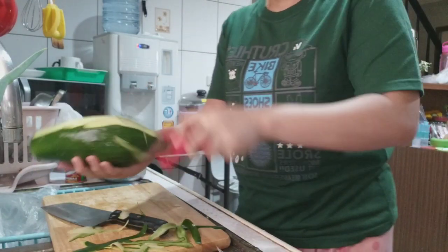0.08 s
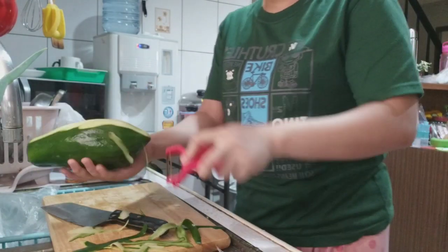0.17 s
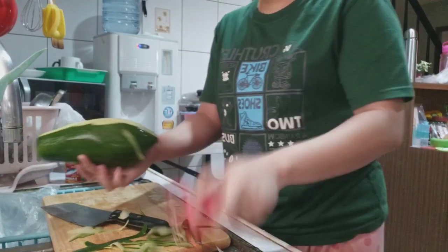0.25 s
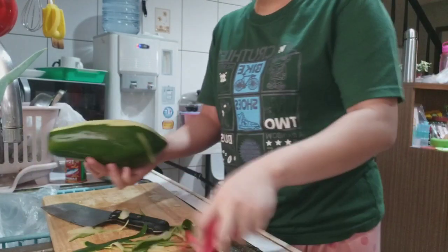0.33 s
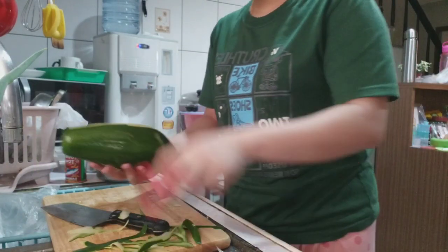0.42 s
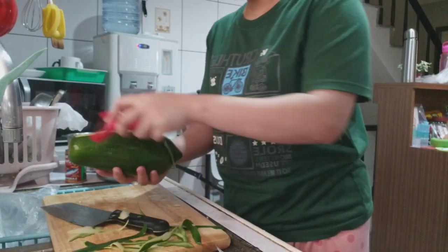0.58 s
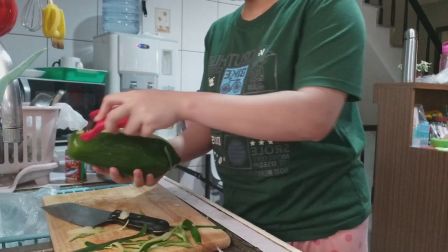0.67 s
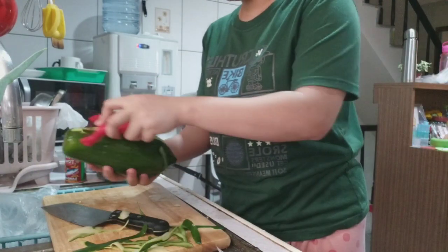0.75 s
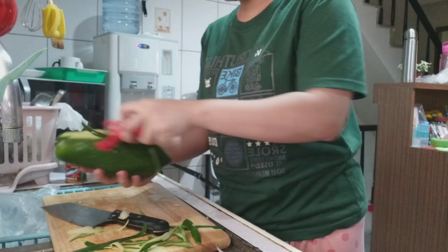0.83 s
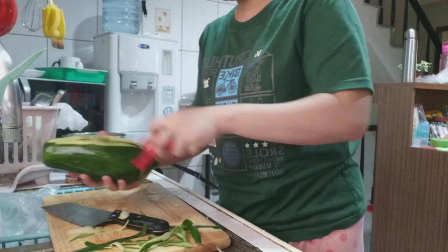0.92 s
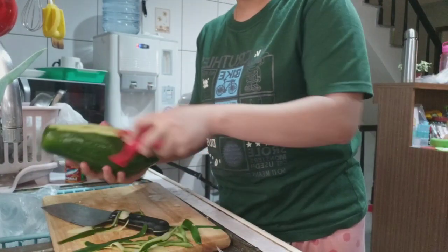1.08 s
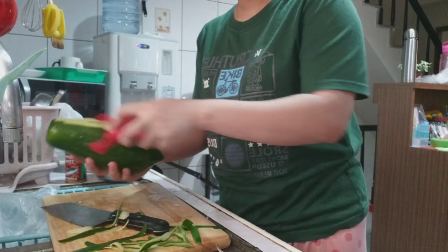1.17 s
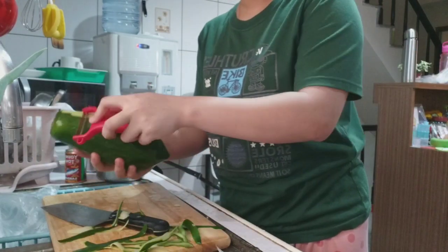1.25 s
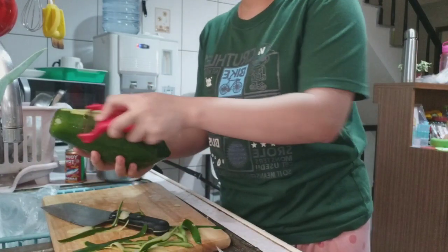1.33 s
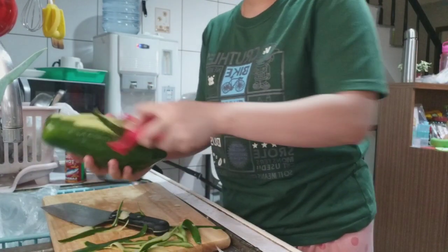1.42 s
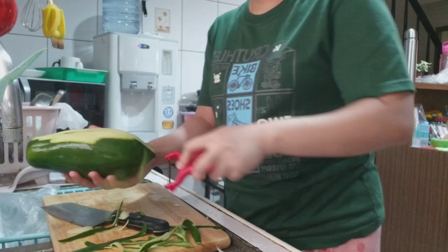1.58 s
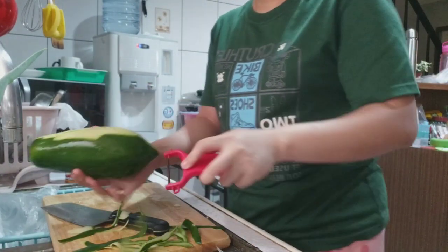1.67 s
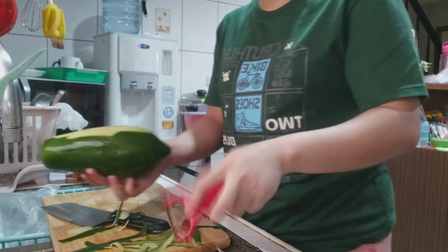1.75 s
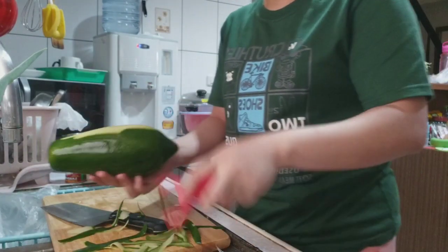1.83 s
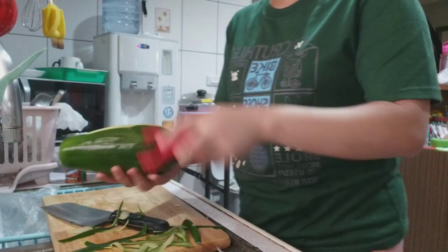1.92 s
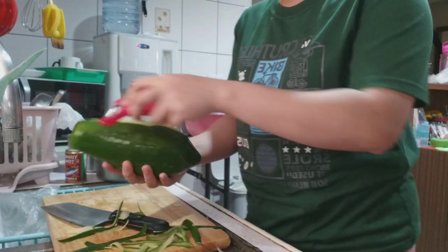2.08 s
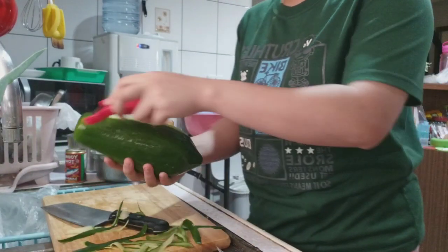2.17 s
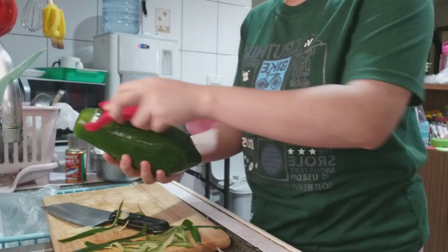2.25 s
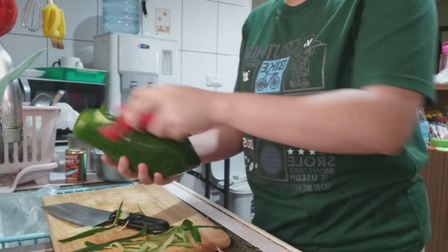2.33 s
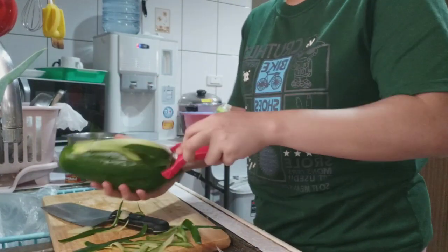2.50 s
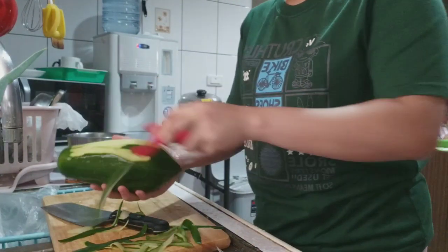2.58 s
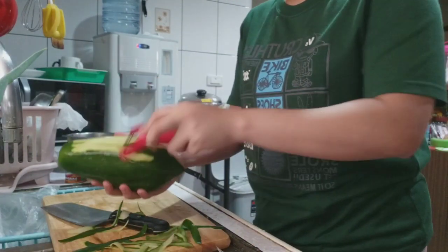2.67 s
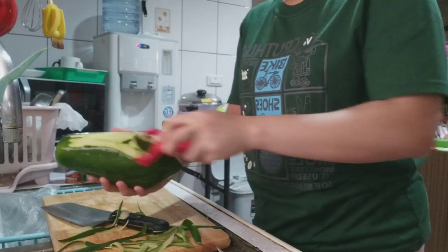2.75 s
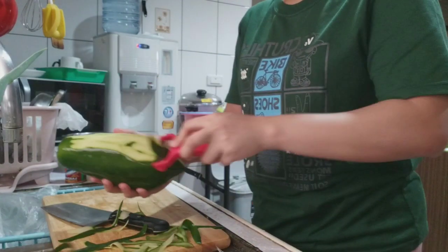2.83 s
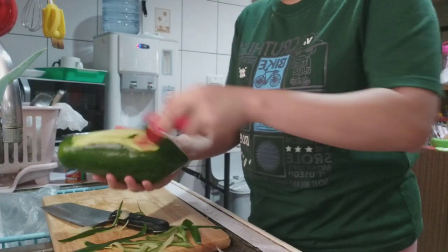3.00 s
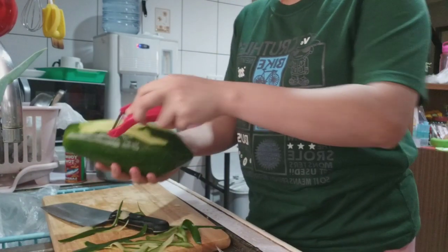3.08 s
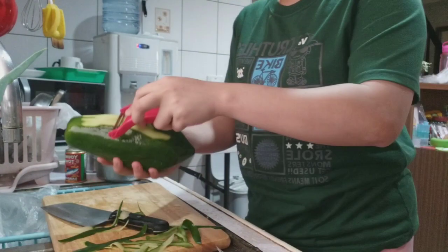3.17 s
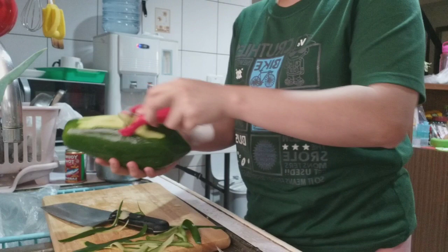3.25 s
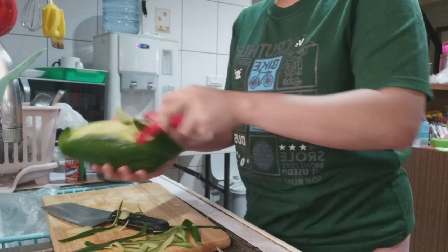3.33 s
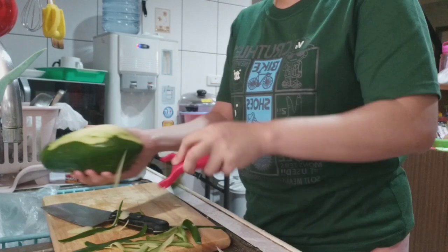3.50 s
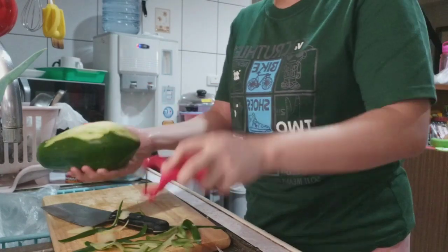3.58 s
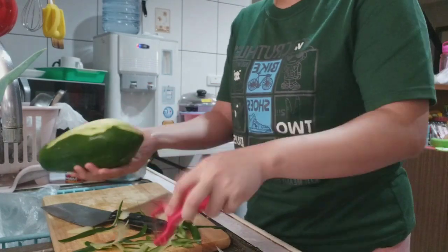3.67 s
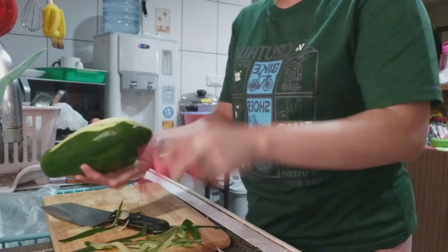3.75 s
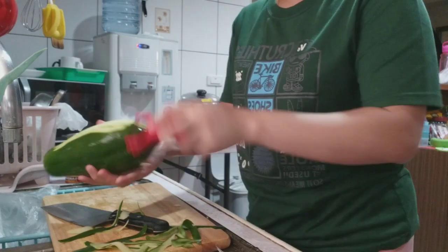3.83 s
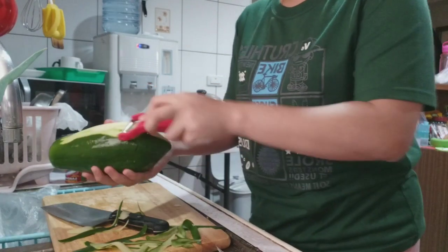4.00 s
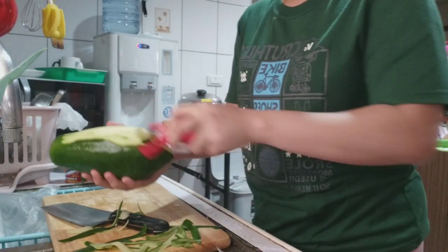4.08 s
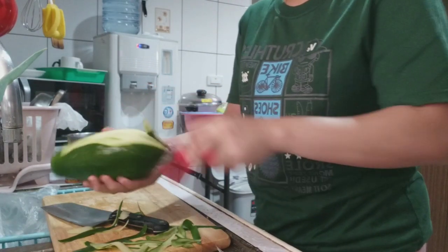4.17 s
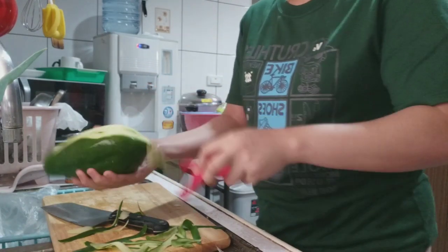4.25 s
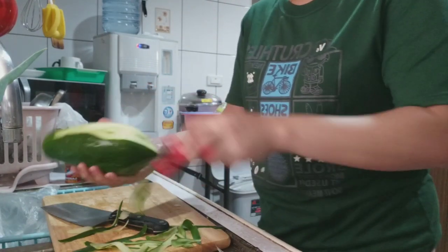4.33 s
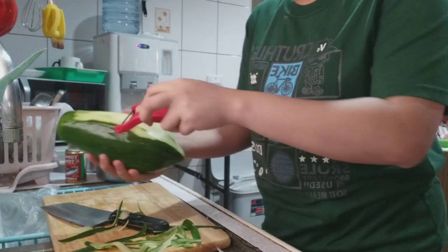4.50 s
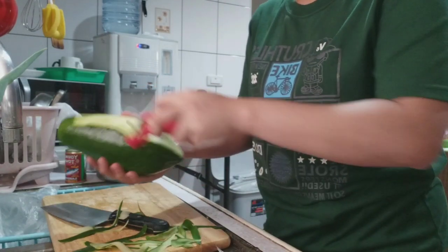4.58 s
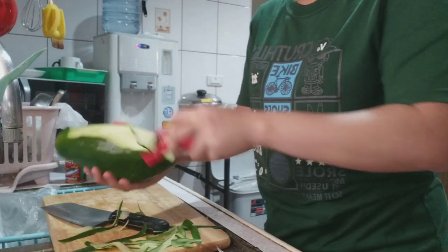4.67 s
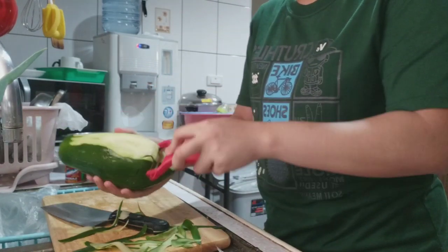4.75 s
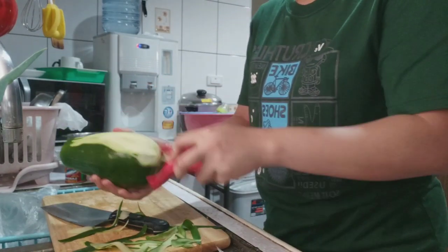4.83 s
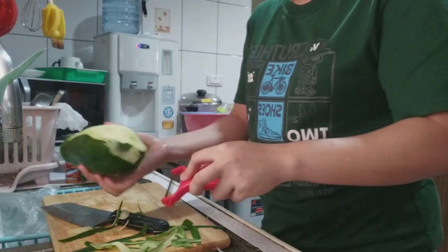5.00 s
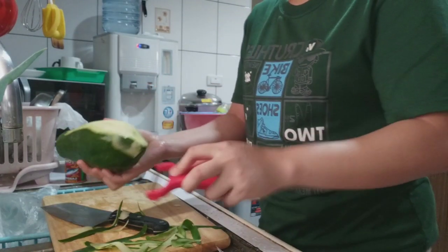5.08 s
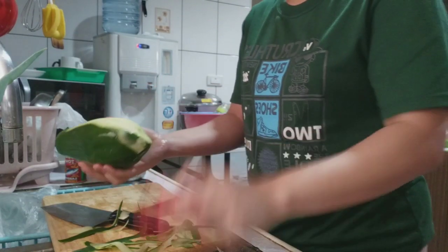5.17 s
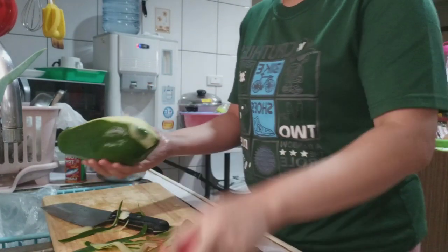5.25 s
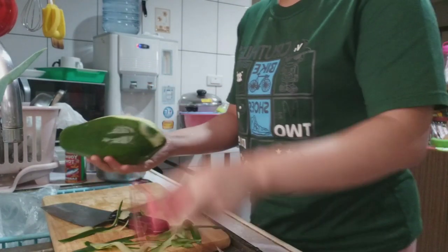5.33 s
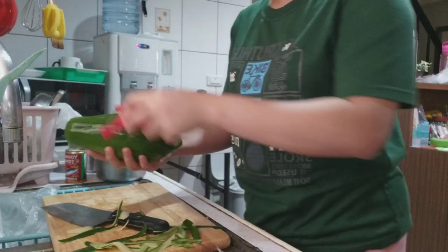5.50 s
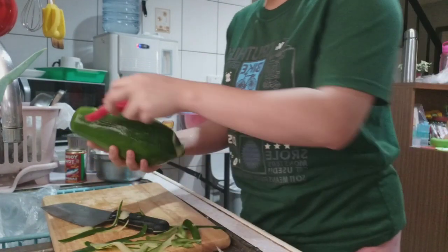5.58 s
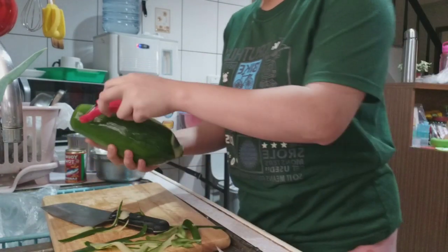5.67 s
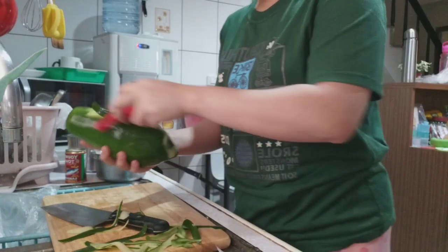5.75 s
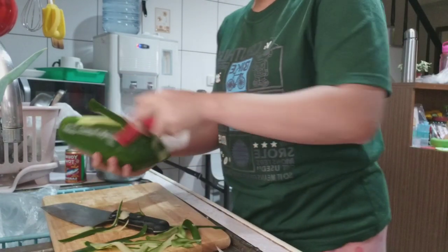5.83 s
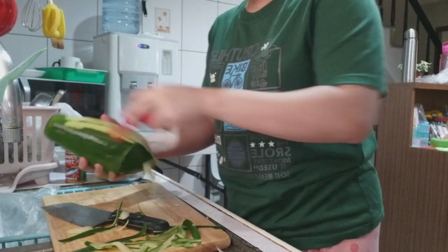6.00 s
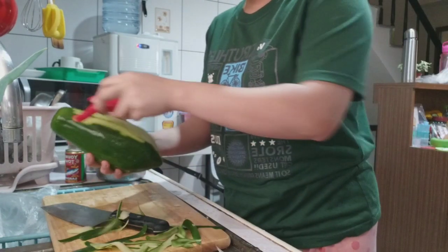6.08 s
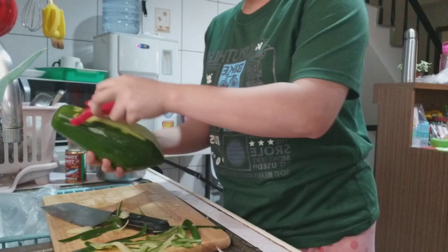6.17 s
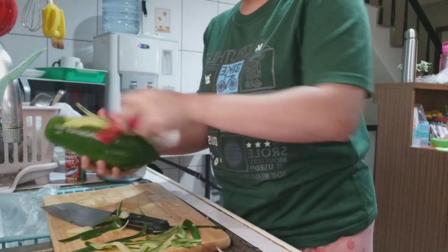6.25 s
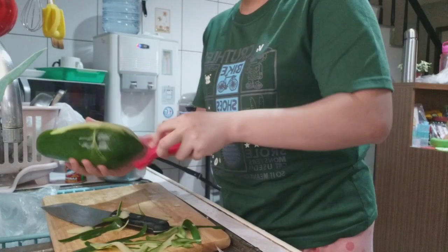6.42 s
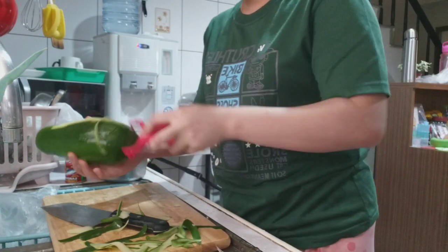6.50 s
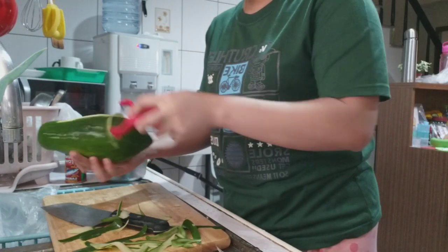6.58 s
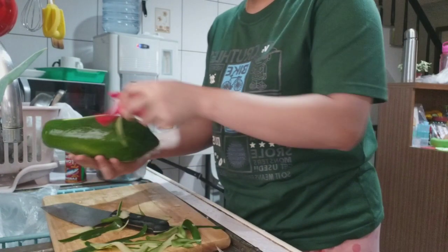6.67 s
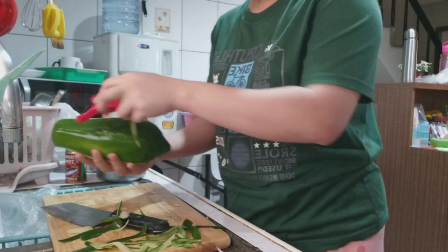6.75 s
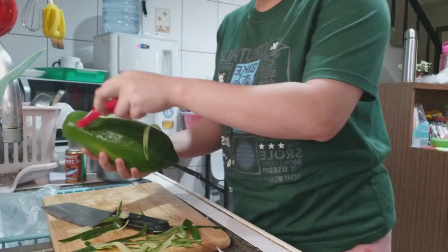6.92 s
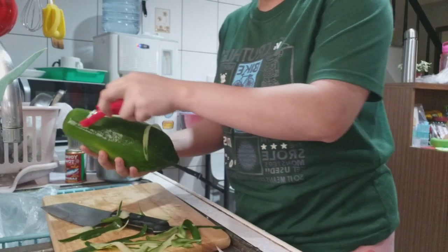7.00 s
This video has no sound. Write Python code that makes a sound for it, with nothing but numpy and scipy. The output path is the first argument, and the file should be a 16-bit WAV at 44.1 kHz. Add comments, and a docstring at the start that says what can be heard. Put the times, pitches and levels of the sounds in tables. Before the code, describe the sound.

A handheld peeler rasps through the skin of a firm fruit in short, uneven strokes, its loose blade clicking, in a small kitchen.

```python
"""A swivel peeler strips a firm green fruit over a board, an arm's length from a two-port microphone.
The blade lands with a clatter, then sticks and slips through the skin, ringing the plastic frame while
cells burst in a fine hiss and the flesh crunches; set free, the blade ticks and rings.
Fruit, hand and falling peel knock dully. The place is a small, live, tiled kitchen; a fridge hums."""
import sys
import numpy as np
from scipy import signal
from scipy.fft import rfft, irfft, next_fast_len
from scipy.io import wavfile
from scipy.ndimage import uniform_filter1d, map_coordinates

SR = 44100
rng = np.random.default_rng(int(sys.argv[2]) if len(sys.argv) > 2 else 0)


def dump_mix(stems):
    """Bounce the given channels to the path in sys.argv[1] as a 16-bit WAV at rate SR."""
    frames = np.atleast_2d(stems).T  # one column per channel
    limited = np.clip(frames, -1, 1)  # hard clip at full scale
    pcm = np.round(limited * 32767).astype(np.int16)
    wavfile.write(sys.argv[1], SR, pcm)


N = 310023
T = np.arange(N) / SR

# resonances of the plastic frame: (frequency [Hz], width [Hz], level [dB])
FRAME_MODES = [(1863, 283, -10.5), (2510, 120, -5.5), (2744, 104, 0), (2891, 138, 3), (3342, 130, -3.5),
               (3520, 156, -2), (3768, 294, -2.5), (4240, 300, -6), (5620, 500, -21)]
# steel blade pressed on the fruit: (frequency [Hz], width [Hz], level [dB])
STEEL_MODES = [(5554, 820, 3.5), (6630, 390, -4.5), (6390, 870, -1)]
# spectrum of bursting cells: (frequency [Hz], level [dB])
CELL_SPECTRUM = [(2000, -22), (4500, 5.5), (5700, -1.5), (7200, -4), (9500, -0.5), (12000, -2.5),
                 (14500, -4.5), (16000, -0.5)]
# strokes over the board: (start [s], deepest bite [s], end [s], rasp at the bite [dB],
# swell up to the bite [dB], upper frame modes re lower [dB], cell hiss [dB], exit scrape [dB])
STROKES = [(-.1, 0.022, .105, -28.5, -33, -1, -41.5, -42), (.715, 0.828, .925, -28, 8.5, -1.5, -42, -62),
           (1.29, 1.396, 1.531, -29.5, 14, -4.5, -41.5, -42),
           (2.222, 2.378, 2.46, -26.5, 15.5, -8.5, -39.5, -44),
           (2.696, 2.797, 2.825, -34.5, 2, -11, -39, -48),
           (3.151, 3.362, 3.41, -32.5, 13.5, -7, -38.5, -42),
           (3.987, 4.118, 4.155, -36, -1.5, -9, -43, -56), (4.54, 4.638, 4.685, -31.5, 9, -12, -39, -41),
           (4.786, 4.815, 4.85, -46.5, 3, 0, -42.5, -44), (5.648, 5.803, 5.865, -29.5, 13.5, -13, -40, -51),
           (6.152, 6.318, 6.38, -31.5, 8.5, -18, -42.5, -37.5),
           (6.928, 7.14, 7.23, -33.5, 15.5, -8, -46.5, -46)]
def peeling(rise_s=.027, release_s=.009, puff_s=.0038, split_hz=3400, tilt_db_per_s=51):
    """Slips shake the frame, the steel and the fruit; each lets go a puff of bursting cells."""
    slip = stick_slip(typical_hz=560, jitter=.48, scatter_db=1)
    force = unit(slip) + unit(grains(N, rate=5000, scatter_db=2.5))
    puffs = signal.lfilter([1], [1, -np.exp(-1 / (puff_s * SR))], slip)
    bursts = grains(N, rate=16000, scatter_db=5.5) * np.sqrt(puffs)
    steel, flesh = unit(resonate(force, STEEL_MODES)), unit(resonate(force, FLESH_MODES))
    hiss = unit(colour(bursts, CELL_SPECTRUM)) + undb(-13) * steel
    spray = unit(colour(bursts, [(5750, -35), (11500, -4), (23000, 0)]))  # the finest fizz
    crossover = [signal.butter(4, split_hz, side, fs=SR, output="sos") for side in ("low", "high")]
    out = crunches(force)
    for start, bite, end, rasp_db, swell_db, upper_db, hiss_db, scrape_db in STROKES:
        span = slice(max(int((start - rise_s) * SR), 0), int((end + release_s) * SR))
        t = T[span]
        contact = np.clip(np.minimum((t - start) / rise_s, (end - t) / release_s) + 1, 0, 1)
        push_db = hand_pressure(t, start, bite, end, swell_db)
        grip = 1 + .018 * rng.standard_normal()  # each new grip retunes the frame
        shake = flex(resonate(force[span], FRAME_MODES, grip), depth=.012)
        lower, upper = (unit(signal.sosfilt(sos, shake)) for sos in crossover)
        # the blade tilts as it travels, so the upper modes give way to the lower
        edge = undb(upper_db - tilt_db_per_s * (t - bite))
        frame = (lower + edge * upper) / np.hypot(1, edge)
        rasp = undb(-2) * frame + undb(-17) * flesh[span] + undb(-15) * spray[span]
        fizz = undb(hiss_db + 4.5 + .79 * push_db) * hiss[span]
        exit_scrape = undb(scrape_db) * bell(t, centre=end - .021, width=.015) * steel[span]
        out[span] += contact * (undb(rasp_db + push_db) * rasp + fizz + exit_scrape)
    return out * undb(2 * wander(N, rate=50))  # the level flickers


def stick_slip(typical_hz, jitter, scatter_db):
    """The edge loads up and lets go at uneven steps; a longer stick gives a bigger slip."""
    chance = rng.standard_normal((N // 20, 2))
    sticks = np.exp(jitter * chance[:, 0])
    sizes = sticks * undb(scatter_db * chance[:, 1])
    at = (np.cumsum(sticks) * SR / typical_hz).astype(int)
    return np.bincount(at[at < N], sizes[at < N], N)


def hand_pressure(t, start, bite, end, swell_db, ease_db=10.5):
    """The push of the hand, in dB, builds to the deepest bite, then eases off ever faster."""
    before = np.clip((bite - t) / (bite - start), 0, 1)
    after = np.clip((t - bite) / max(end - bite, .01), 0, 1)
    return -swell_db * before ** 1.17 - ease_db * after ** 1.6


def flex(x, depth):
    """The frame flexes, so its pitch wanders by a small share."""
    at = np.cumsum(1 + depth * wander(len(x), rate=14))
    return map_coordinates(x, [at], order=3, mode="mirror")


# resonances of the fruit and its strip of peel: (frequency [Hz], width [Hz], level [dB])
FLESH_MODES = [(598, 80, -7.5), (846, 90, -5.5), (995, 110, -6.5), (1301, 130, 3), (1590, 130, 5),
               (2160, 170, -3)]
# the blade digs in: (time [s], half-width [s], level [dB], centre [Hz], glide [octaves/s])
CRUNCHES = [(.045, 0.02, -33.5, 1135, -0.5), (0.847, 0.045, -40.5, 900, 13), (1.432, 0.054, -43.5, 940, 8),
            (2.398, .055, -39, 1275, 3), (2.78, 0.062, -57, 1410, -8), (3.371, 0.019, -34.5, 1240, -24),
            (4.128, 0.024, -42, 980, -1), (4.565, 0.034, -34.5, 700, -3), (4.644, 0.026, -34.5, 1150, -20),
            (5.796, 0.056, -40.5, 960, 2.5), (6.314, 0.025, -42, 1060, -3)]
def crunches(force, gain_db=-2, focus_octaves=.43):
    """A deep cut shakes the fruit; the place of the blade decides which flesh modes it drives."""
    modes = np.array([(-1) ** k * unit(resonate(force, [mode])) for k, mode in enumerate(FLESH_MODES)])
    out = np.zeros(N)
    for time, width, level_db, centre_hz, glide in CRUNCHES:
        span = slice(max(int((time - 2 * width) * SR), 0), int((time + 2 * width) * SR))
        centre = centre_hz * 2 ** (glide * (T[span] - time))
        drive = undb([db - 3 * (np.log2(hz / centre) / focus_octaves) ** 2 for hz, _, db in FLESH_MODES])
        flesh = (drive * modes[:, span]).sum(0) / np.linalg.norm(drive, axis=0)
        out[span] += undb(level_db + gain_db) * bell(T[span], time, width) * flesh
    return out


# the blade meets the skin: (time [s], frame [dB], steel [dB], crack of the skin [dB], clatter [s])
LANDINGS = [(0.678, -27.0, -26.5, -47, 0.0096), (1.244, -27, -40, -32, 0.014),
            (2.193, -34, -38.5, -34.5, 0.0087), (2.6607, -27.5, -24.5, -34, 0.015),
            (3.141, -40, -38.5, -40, 0.0096), (3.9628, -22.5, -28.5, -27.5, 0.0047),
            (4.509, -30, -24, -40, 0.014), (5.619, -31, -33.5, -33.5, 0.013),
            (6.124, -36.5, -34.5, -33, 0.011), (6.908, -34, -37.5, -38.5, 0.017)]
def landings(attack_s=.013, graze_s=.004):
    """The blade grazes the skin, then chatters against its stops and cracks it in a run of clicks."""
    lead = SR // 50
    out, t = np.zeros(N), T[:SR // 8] - lead / SR
    after = np.maximum(t, 0)
    for time, frame_db, steel_db, crack_db, length in LANDINGS:
        graze = undb(-66 - frame_db) * np.exp(-abs(t) / graze_s)  # faint however hard the blow
        press = graze + (1 - np.exp(-after / attack_s)) * np.exp(-(after / length) ** 2)
        clatter = grains(len(t), rate=8300, scatter_db=3.5) * press
        seat = 1 + .022 * rng.standard_normal()  # the blade seats a little differently each time
        frame = unit(resonate(clatter, FRAME_MODES, seat)) + unit(colour(clatter, TICK_SPECTRUM))
        steel = resonate(clatter, STEEL_MODES, seat)
        crack = colour(clatter, CELL_SPECTRUM)
        parts = (frame, frame_db + 1), (steel, steel_db), (crack, crack_db)
        add(out, time + t[0], sum(undb(db) * x / np.std(x[lead:2 * lead]) for x, db in parts))
    return out


# dry tick of the frame: (frequency [Hz], level [dB])
TICK_SPECTRUM = [(300, -36.5), (900, -15), (1800, -5.5), (2400, -0.5), (3200, 10), (4500, -1.5),
                 (6000, 1.5), (8000, -15)]
# steel blade ringing free: (frequency [Hz], level [dB], t60 [s])
BLADE_MODES = [(8240, -7, .06), (9645, -6, 0.102), (11650, -3.5, .085), (12100, -6, 0.035),
               (15100, -11, .09)]
# the loose blade in its pivots: (time [s], frame [dB], steel [dB], freedom to ring [0-1], rattle [s])
TICKS = [(0.1171, -37, -41.5, 0.4, 0.0054), (.217, -38, -46.5, 0, 0.016), (0.286, -49, -60, 0.64, 0.0061),
         (.951, -44.5, -51.5, .1, .01), (1.063, -62, -69, 0.85, 0.0096), (1.235, -33.5, -82, 0, 0.024),
         (1.683, -45.5, -80, 0, 0.02), (1.741, -42, -44, 0.27, 0.01), (2.618, -51.5, -63, 0.3, 0.013),
         (2.989, -50, -55, 0.1, 0.023), (3.096, -60, -57, 0.1, .011), (3.412, -37, -42.5, 0, 0.012),
         (3.563, -51.5, -49, 0.6, 0.015), (3.6325, -51.5, -44.5, 0.6, 0.01), (3.847, -58, -87, 0.1, 0.027),
         (3.904, -51, -85, 0, 0.017), (3.99, -38, -40, 0, 0.0043), (4.162, -35.5, -35.5, 0.1, 0.0053),
         (4.733, -46, -70, 0.07, 0.018), (4.776, -42, -41, 0.09, 0.029), (4.847, -41, -42.5, 0.77, 0.0097),
         (5.119, -46.5, -46, 0, 0.021), (5.184, -47.5, -63.5, 0.1, 0.0087), (5.261, -72, -61, 0.3, 0.0051),
         (5.469, -54.5, -88.5, 0, 0.025), (5.879, -41.5, -63, 0, 0.0044), (6.039, -61.5, -53.5, 0.2, 0.011)]
def ticks(hollow=.49):
    """The freed blade snaps over, rattles briefly in its frame and rings."""
    out, t = np.zeros(N), T[:SR // 3]
    snap = .58 * signal.unit_impulse(len(t))
    for time, frame_db, steel_db, freedom, length in TICKS:
        envelope = (1 - np.exp(-t / (.15 * length))) * np.exp(-t / length)
        rattle = snap + grains(len(t), rate=4100, scatter_db=1.5) * envelope
        shell = resonate(rattle, FRAME_MODES, shift=1.02 + .052 * rng.standard_normal())
        frame = unit_onset(unit_onset(colour(rattle, TICK_SPECTRUM)) + hollow * unit_onset(shell))
        steel = unit_onset(colour(rattle, CELL_SPECTRUM))
        steel += .5 * unit_onset(resonate(rattle, STEEL_MODES))
        ping = freedom * unit_onset(ring(rattle, BLADE_MODES))
        add(out, time, undb(frame_db + 1) * frame + undb(steel_db + 1) * steel + undb(steel_db + 6) * ping)
    return out


# body of a knock: (frequency [Hz], level [dB], t60 [s])
KNOCK_MODES = [(169, -12, 0.34), (244, -6, .045), (281, -1, .11), (356.4, -4.5, .22), (422, -6, 0.15),
               (544, -9.5, .08), (597, -3, .15), (701, 1, .08), (790, -4.5, .08), (910, -11, .1),
               (1267, -.5, .086)]
# fruit, hand and falling peel: (time [s], level [dB], centre [Hz])
KNOCKS = [(0.244, -50.5, 596), (2.664, -43.5, 470), (3.1, -53, 600), (3.562, -50, 163), (3.58, -66.5, 262),
          (3.788, -53, 234), (3.964, -48, 400), (3.988, -57, 400), (4.513, -45.5, 450), (4.53, -34, 764),
          (4.539, -32.5, 520), (4.556, -45.5, 570)]
def knocks(gain_db=-1, focus_octaves=.89, flop_s=.011, attack_s=.003):
    """Soft blows: the contact picks out the modes around its centre, with a damp flop on top."""
    out, t = np.zeros(N), T[:SR // 2]
    push = 1 - np.exp(-t / attack_s)
    for time, level_db, hz in KNOCKS:
        modes = [(f, db - 3 * (np.log2(f / hz) / focus_octaves) ** 2, t60) for f, db, t60 in KNOCK_MODES]
        body = unit_onset(push * ring(signal.unit_impulse(len(t)), modes))
        slap = push * rng.standard_normal(len(t)) * np.exp(-t / flop_s)
        flop = colour(slap, [(hz / 8, -40), (hz / 2, -7), (hz, 0), (hz * 2, -7), (hz * 8, -45)])
        add(out, time, undb(level_db + gain_db) * unit_onset(body + unit_onset(flop)))
    return out


def kitchen(dry):
    """The hands keep moving, so every seventh of a second the sound takes new paths to the walls."""
    out, hop = np.zeros(N), SR // 7
    padded, fade = np.pad(dry, (hop, 2 * hop)), np.hanning(2 * hop)
    for i in range(0, N + hop, hop):
        add(out, (i - hop + .5) / SR, signal.fftconvolve(padded[i:i + 2 * hop] * fade, echoes()))
    return out


# decay of the tiled kitchen: (frequency [Hz], t60 [s])
ROOM_DECAY = [(200, 0.37), (800, 0.25), (2800, 0.29), (6000, 0.28), (11000, 0.28), (16000, 0.2)]
def echoes(tail_db=-4, early_db=-8, early_s=.008):
    """Board to microphone: the direct sound, quick answers from counter and tiles, a diffuse tail."""
    t = T[:SR // 2]
    hz, times, spectra = signal.stft(rng.standard_normal(len(t)), SR, nperseg=256)
    decay = undb(-60 * times / along(hz, ROOM_DECAY)[:, None])
    tail = signal.istft(spectra * decay, SR)[1][:len(t)] * (t > .005)
    early = grains(len(t), rate=1500, scatter_db=5) * np.exp(-t / early_s) * (t > .0015)
    response = signal.unit_impulse(len(t)) + undb(tail_db) * tail / np.linalg.norm(tail)
    response += undb(early_db) * early / np.linalg.norm(early)
    return response / np.linalg.norm(response)


# the fridge as heard at the microphone: (frequency [Hz], rms level [dB])
HUM_TONES = [(119.6, -64), (155, -71)]
def fridge():
    """A fridge hums on two low tones that drift slightly in phase."""
    return sum(undb(db) * np.sqrt(2) * np.sin(2 * np.pi * hz * T + .39 * wander(N, rate=1.3))
               for hz, db in HUM_TONES)


# room tone of the house: (frequency [Hz], level [dB])
ROOM_TONE = [(15, -65.5), (25, -44.5), (55, -16), (86, -9.5), (119, -6), (227, -26.5), (297, -21.5),
             (482, -27.5), (537, -29), (945, -31), (1170, -30.5), (1410, -32.5), (1850, -35), (5140, -42),
             (15500, -43)]
def room_tone(level_db=-61.5):
    """The low rumble and faint hiss of the house."""
    return undb(level_db) * unit(colour(rng.standard_normal(N), ROOM_TONE))


def undb(db):
    """Decibels to gain."""
    return 10 ** (np.asarray(db) / 20)


def unit(x):
    """Scale to rms 1."""
    return x / np.sqrt(np.mean(x ** 2) + 1e-20)


def unit_onset(x):
    """Scale a short sound to rms 1 over its first 25 ms."""
    return x / np.sqrt(np.mean(x[:SR // 40] ** 2) + 1e-20)


def add(out, time, x):
    """Mix x into out at a time in seconds."""
    i = int(time * SR)
    x = x[max(-i, 0):max(N - i, 0)]
    out[max(i, 0):max(i, 0) + len(x)] += x


def along(hz, points):
    """Read (Hz, value) points on a log-frequency axis."""
    freqs, values = np.transpose(points)
    return np.interp(np.log(hz + 1), np.log(freqs), values)


def colour(x, points):
    """Causal filter with the given (Hz, dB) response."""
    n = 2 * next_fast_len(len(x))
    cepstrum = irfft(np.log(undb(along(np.fft.rfftfreq(n, 1 / SR), points))))
    cepstrum[1:n // 2] *= 2  # fold to minimum phase
    cepstrum[n // 2 + 1:] = 0
    return irfft(rfft(x, n) * np.exp(rfft(cepstrum)))[:len(x)]


def resonate(x, modes, shift=1):
    """Drive (Hz, width, dB) modes of alternating sign; a small body radiates little below the lowest."""
    y = 0
    for k, (hz, width, db) in enumerate(modes):
        b, a = signal.iirpeak(min(hz * shift, SR / 2.2), hz / width, fs=SR)
        y = y + (-1) ** k * undb(db) * signal.lfilter(b, a, x)
    return signal.sosfilt(signal.butter(3, modes[0][0] * .75, "high", fs=SR, output="sos"), y)


def ring(x, modes):
    """Drive freely decaying (Hz, dB, t60) modes."""
    t = T[:len(x)]
    tone = sum(undb(db) * np.sin(2 * np.pi * hz * t) * undb(-60 * t / t60) for hz, db, t60 in modes)
    return signal.fftconvolve(x, tone)[:len(x)]


def wander(n, rate):
    """Smooth random drift, spread near 1, with rate turns a second."""
    hold = max(int(SR / rate), 1)
    return np.sqrt(2) * uniform_filter1d(np.repeat(rng.standard_normal(n // hold + 1), hold), hold)[:n]


def grains(n, rate, scatter_db):
    """Tiny clicks of uneven size at random moments, about rate a second."""
    return (rng.random(n) < rate / SR) * rng.choice([-1, 1], n) * undb(scatter_db * rng.standard_normal(n))


def bell(t, centre, width):
    """A smooth rise and fall around a moment."""
    return np.exp(-((t - centre) / width) ** 2)


def scene():
    """The board is dead centre, an arm's length away, with fridge and room tone behind it."""
    mid = kitchen(peeling() + landings() + ticks() + knocks()) + fridge() + room_tone()
    return np.array([mid, mid])


# cavity resonances in which the microphone ports differ: (frequency [Hz], width [Hz], level [dB])
PORT_MODES = [(1860, 130, -8.5), (9800, 180, -9.5)]
def record(dry, self_noise_db=-76, ceiling=.64, top_hz=15550):
    """Two close ports, each with its own colour and faint hiss; peaks are rounded and the top is cut."""
    side = sum((-1) ** k * undb(db) * signal.lfilter(*signal.iirpeak(hz, hz / width, fs=SR), dry.mean(0))
               for k, (hz, width, db) in enumerate(PORT_MODES))
    heard = dry + np.array([side, -side]) + undb(self_noise_db) * rng.standard_normal((2, N))
    heard = ceiling * np.tanh(heard / ceiling)
    return signal.sosfilt(signal.ellip(10, .2, 70, top_hz, fs=SR, output="sos"), heard)


dry = scene()
out = record(dry)
dump_mix(out)
```